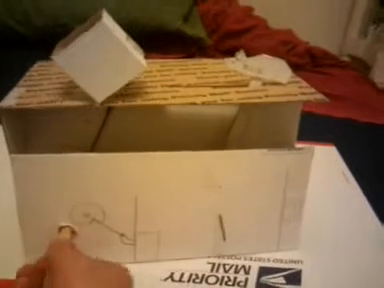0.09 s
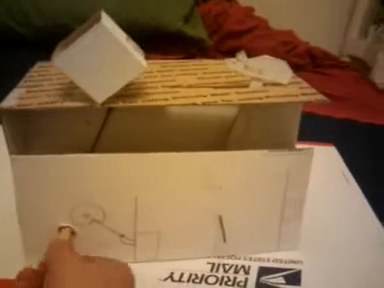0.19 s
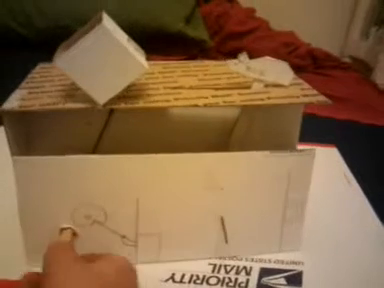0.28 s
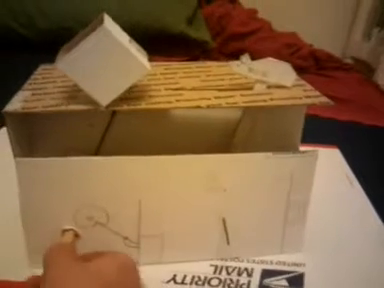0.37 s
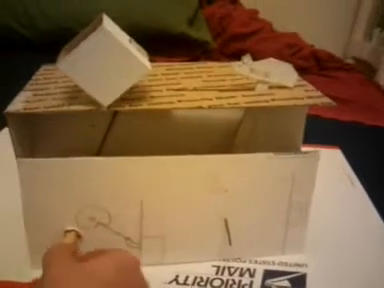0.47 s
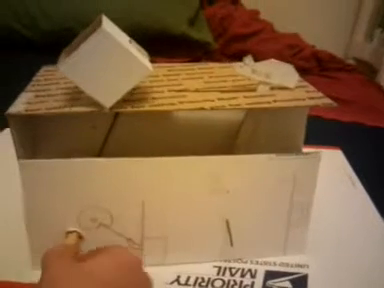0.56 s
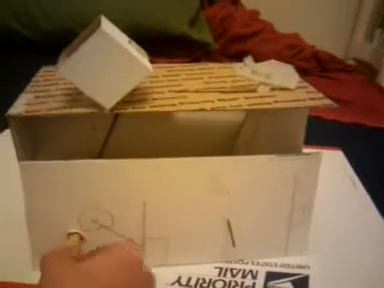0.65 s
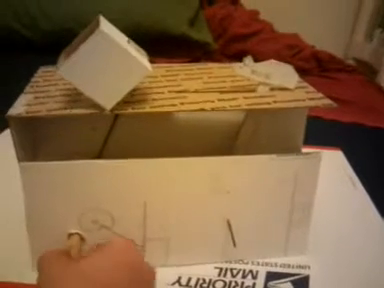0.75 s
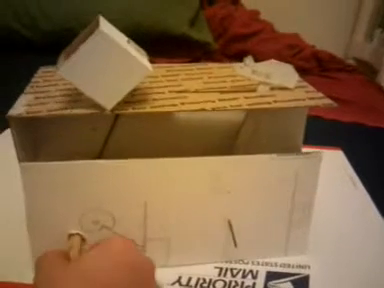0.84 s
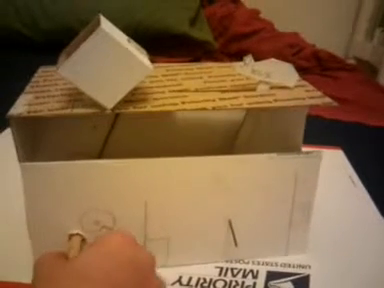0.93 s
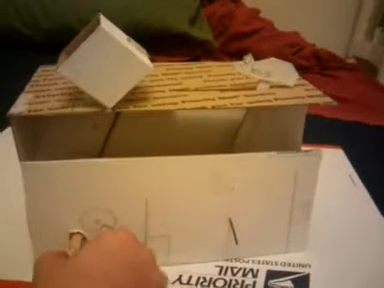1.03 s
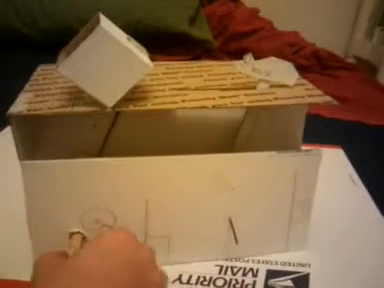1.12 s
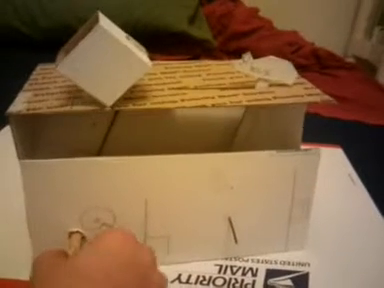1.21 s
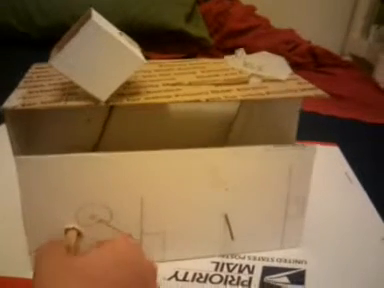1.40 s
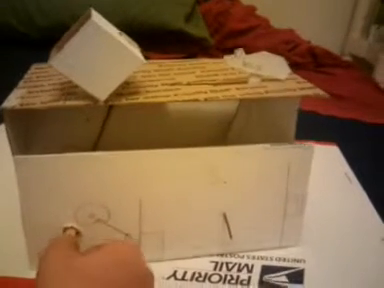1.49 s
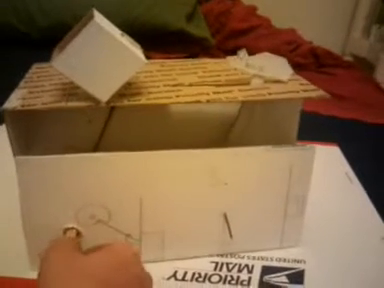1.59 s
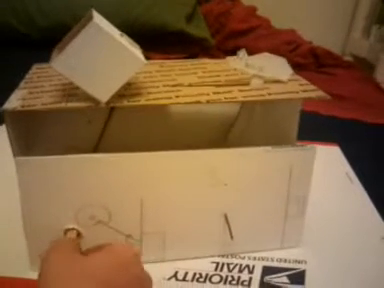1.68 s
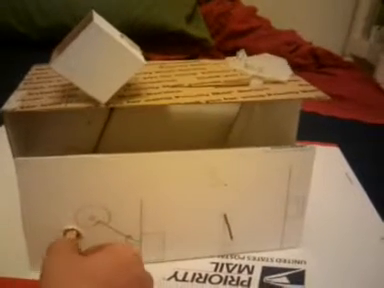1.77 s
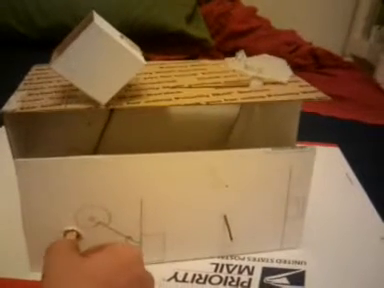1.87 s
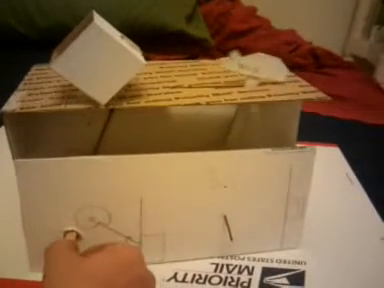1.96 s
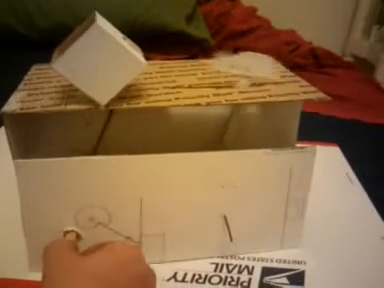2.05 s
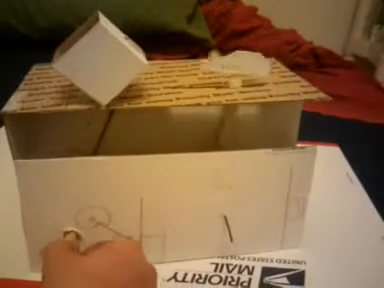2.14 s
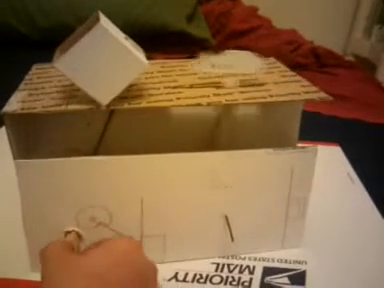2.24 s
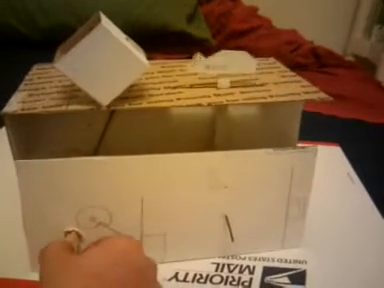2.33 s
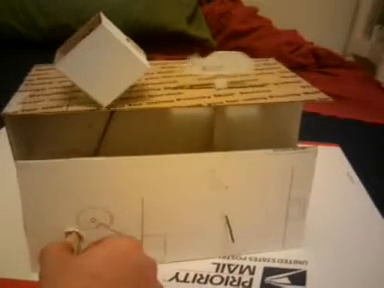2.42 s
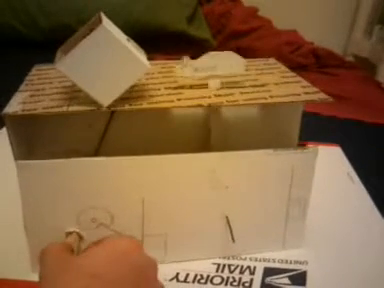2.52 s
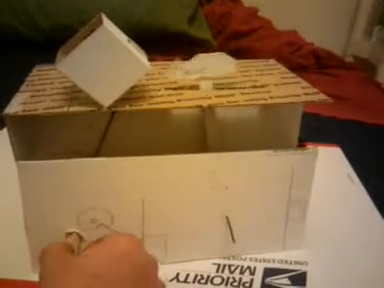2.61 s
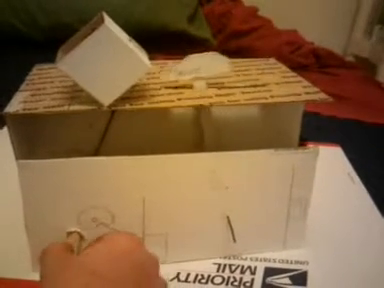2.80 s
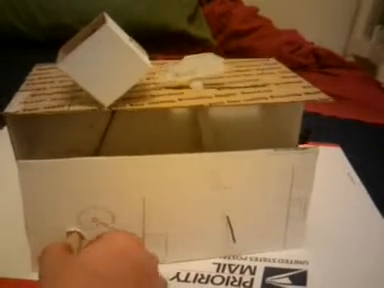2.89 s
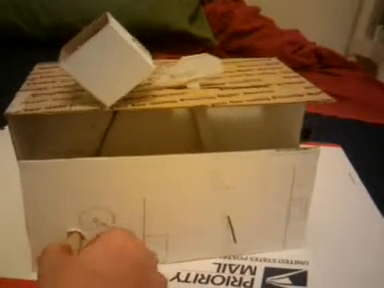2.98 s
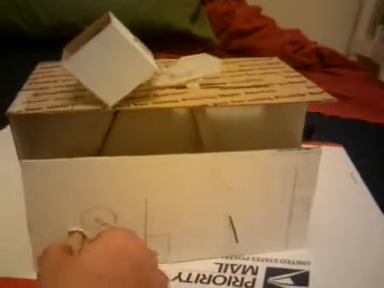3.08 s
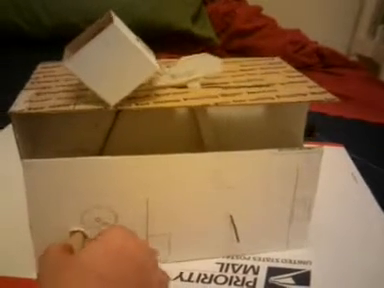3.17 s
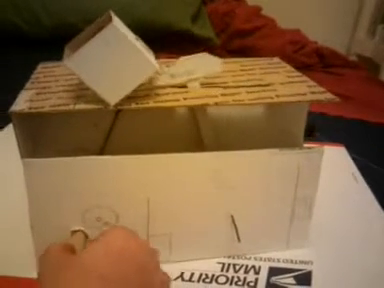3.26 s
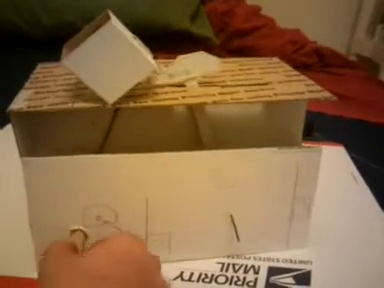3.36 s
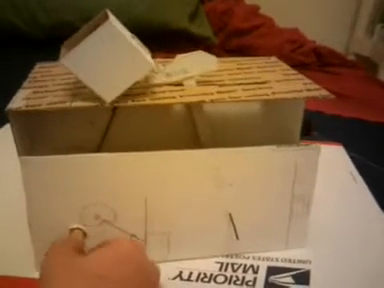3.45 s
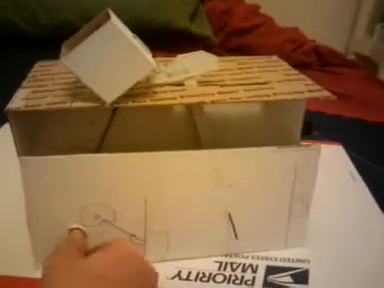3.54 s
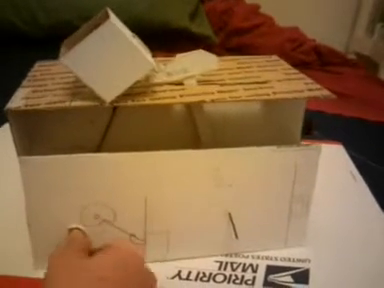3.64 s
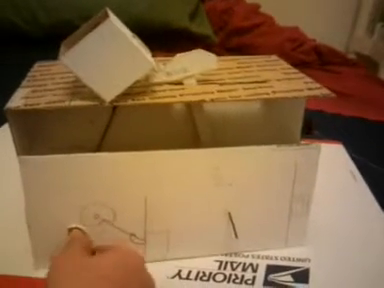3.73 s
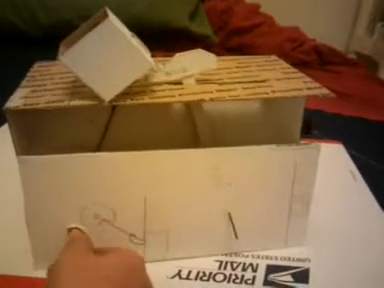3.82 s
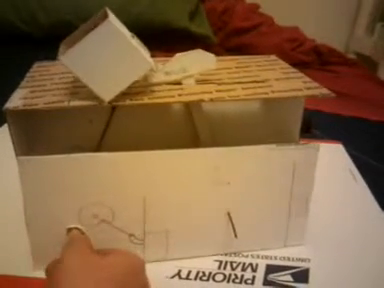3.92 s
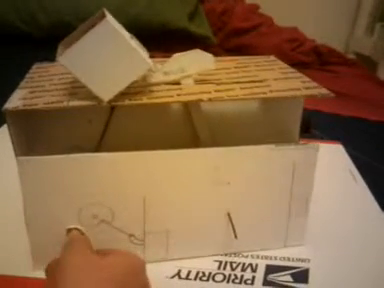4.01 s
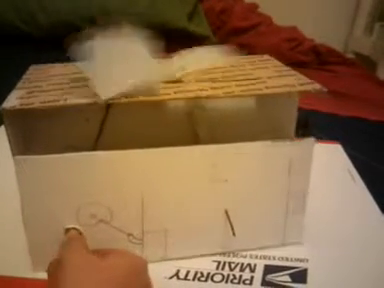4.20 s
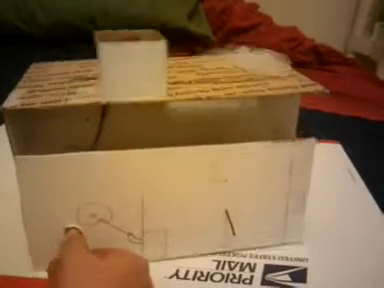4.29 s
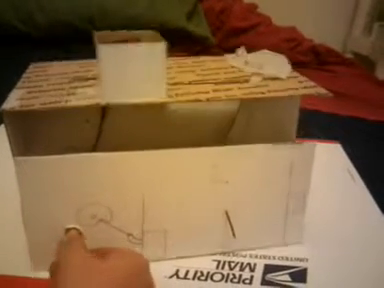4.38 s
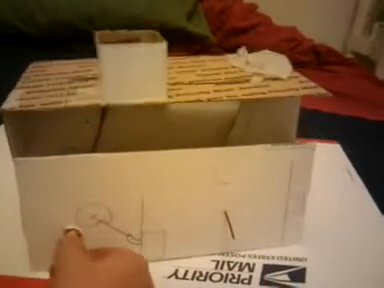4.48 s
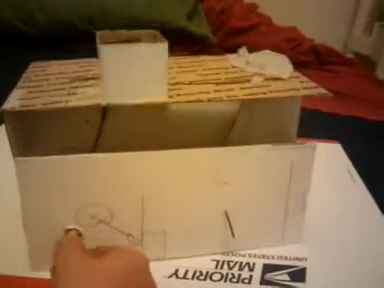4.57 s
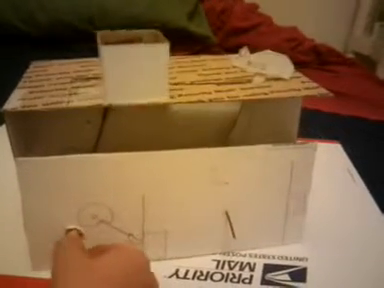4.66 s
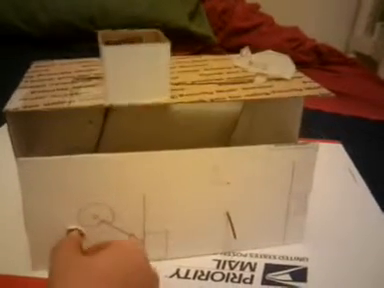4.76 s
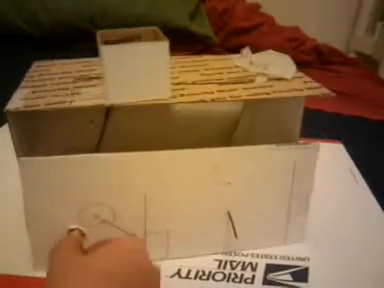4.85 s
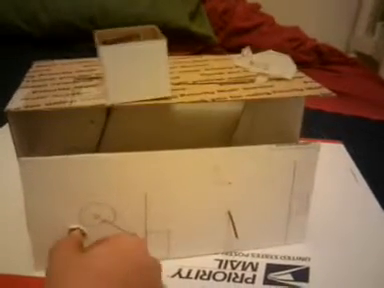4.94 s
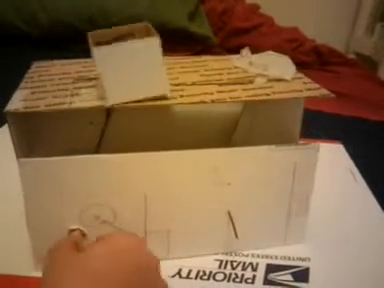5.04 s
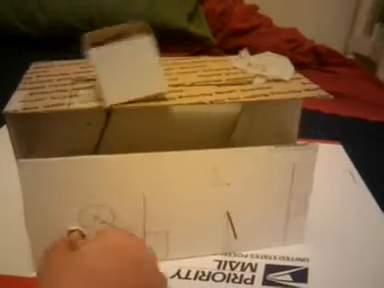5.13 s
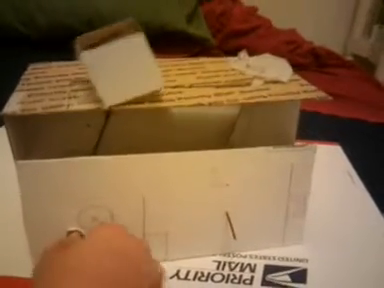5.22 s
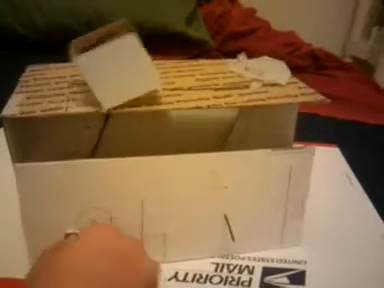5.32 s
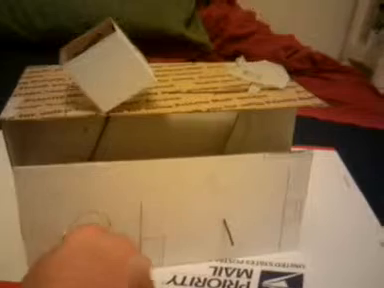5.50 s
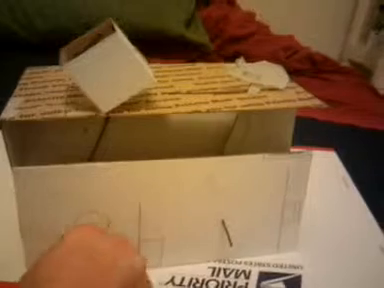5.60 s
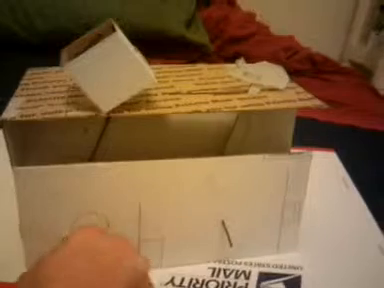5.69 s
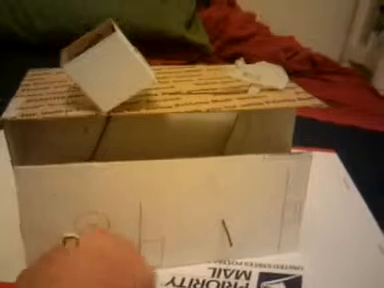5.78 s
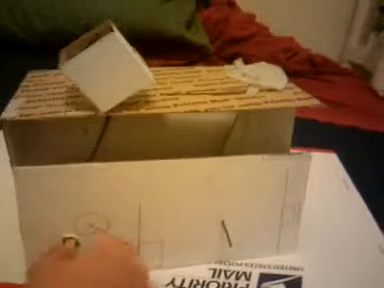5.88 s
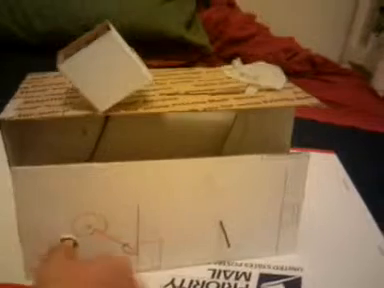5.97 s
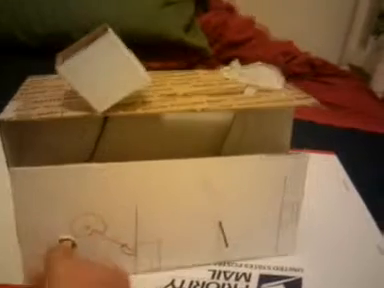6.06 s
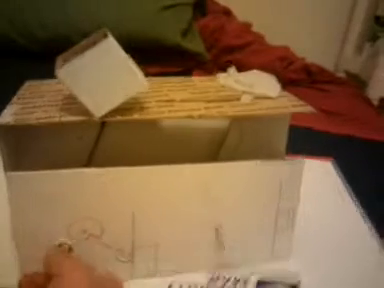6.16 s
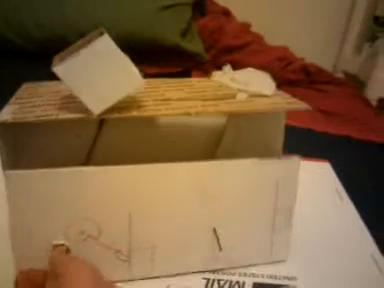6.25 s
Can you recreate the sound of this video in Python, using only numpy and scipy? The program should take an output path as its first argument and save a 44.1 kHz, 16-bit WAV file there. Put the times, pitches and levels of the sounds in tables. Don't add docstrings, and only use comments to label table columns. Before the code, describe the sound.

A small camera microphone sits close to a cardboard box in a quiet bedroom; steady dull hiss and barely audible mains hum run throughout. It opens with a dull jolt and dry wood-on-card rub, then irregular tiny ticks and scrapes until about 1.05 s, densest from 0.6 to 1.0. Mostly hiss follows, with faint catches and rubs at 1.7-2.4. Light cam taps click around 2.7-2.8, then near quiet until a firmer knock at 3.7 and small taps from 3.8 to 4.25. At 4.37 a paper figure snaps back: the loudest, sharp, papery crack with rapid bounces to 4.43 and a rub. At 4.55 a small box lands with a hard, hollow double-contact knock, quickly settling. Duller bumps come at 4.83 and 4.91, the latter clearer; soft rubbing and faint jolts around 5.25-5.5, hiss, then a small double bump at 6.25. Reverberation is short and soft.

```python
import sys
import numpy as np
from scipy import signal
from scipy.io import wavfile
from scipy.ndimage import uniform_filter1d

SR = 44100
rng = np.random.default_rng(int(sys.argv[2]) if len(sys.argv) > 2 else 0)


def ratio_of_db(decibels):
    return 10 ** (np.asarray(decibels, float) / 20)


def generate_wav(sig):
    pcm = np.round(np.clip(np.atleast_2d(sig).T, -1, 1) * 32767).astype(np.int16)
    wavfile.write(sys.argv[1], SR, pcm)


N = 278269

# f/Hz, level/dB rms
HUM_LINES = [(30, -76), (120, -76.5), (148, -70.5), (240, -75.5)]
# f/Hz, level/dB per Hz
HISS_SPECTRUM = [(12, -30), (20, 4), (22, -16), (48, -3.5), (59, -14.5), (103, -5.5), (157, -2.5),
                 (221, -7), (256, -3.5), (296, -10.5), (379, -5.5), (618, -13), (682, -6.5), (2210, -7),
                 (7000, -27), (9100, -54.5), (15400, -120)]
# f/Hz, t60/s
ROOM_T60 = [(200, 0.16), (1000, 0.27), (3000, 0.33), (7000, 0.2)]
# f/Hz, step/band rms
CAMERA_STEP = [(100, .15), (1000, .8), (2300, 1.5), (3500, 2.5), (5500, 2.7), (7000, 2.0)]
CAMERA_TOP_HZ = (6600, 7020, 7300, 7460)

# f/Hz, width/Hz, level/dB
RUBBED_PANEL = [(237, 70, -11.5), (325, 120, -3.5), (494, 180, -4), (704, 220, -4), (936, 200, -0.5),
                (1138, 180, -4.5)]
# f/Hz, width/Hz, level/dB
RUBBED_FOLDS = [(1660, 370, -1), (2310, 220, -5), (3100, 170, -18), (4700, 2700, -15.5)]
# firmest t/s, level/dB, rise/s, fall/s, brightness/dB
STROKES = [(0.015, -48, .05, .09, 1.5), (.17, -52, .07, .07, -3), (.335, -48, .07, .08, -2),
           (.72, -48, .07, .06, -2.5), (.8, -47, .05, .045, -6), (.925, -49.5, .06, .08, -3),
           (.99, -44.5, .1, .06, -7), (1.05, -57, .1, .055, 2), (1.79, -47, .04, .02, -10),
           (2.03, -60, .06, .15, 5), (2.15, -54, .13, .07, -1.5), (2.34, -57, .11, .08, -.6),
           (1.69, -52.5, .02, .055, -4.5), (3.93, -49.5, .04, .08, -3), (4.25, -45, .03, .06, .6),
           (4.345, -50, .09, .2, -5), (4.39, -45, .04, .09, 4), (4.445, -40.5, .1, .075, -8),
           (4.59, -54, .05, .08, 5), (5.255, -53, .035, .06, -2), (5.345, -51, .06, .05, -4),
           (5.44, -49.5, .03, .1, -2), (5.475, -49.5, .2, .07, -3)]

# f/Hz, level/dB, t60/s
HOLLOW_BODY = [(247, 0.5, 0.054), (350, 3.5, 0.035), (442.5, 3, 0.049), (528, -5, 0.078), (743, 0, 0.013)]
# f/Hz, level/dB, t60/s
STIFF_FOLDS = [(1480, -5.5, 0.043), (1798, 4.5, 0.0085), (1910, 0, .015), (2137, 5, 0.012),
               (2677, -15.5, 0.0033), (3456, -14, 0.0095), (4170, -5, 0.018), (5370, -4, 0.014),
               (6600, -21.5, 0.0017)]

# t/s, peak level/dB, panel f/Hz, hardness (folds rel level/dB)
AXLE_SLIPS = [(0.015, -35.5, 964, -7), (0.158, -39.5, 960, -16), (0.179, -39.5, 970, -17),
              (0.306, -37, 906, -13.5), (0.376, -44, 900, -5), (0.625, -33, 953, -12),
              (0.72, -36.5, 983, -21.5), (0.738, -32, 1123, -15.5), (0.767, -38.5, 1055, -12),
              (0.795, -33, 950, -18), (0.81, -36, 910, -12), (0.894, -38, 1104, -18),
              (0.915, -40, 900, -10), (0.973, -29, 1250, -18.5), (1.004, -36, 1193, -16),
              (1.034, -41, 1110, -6), (1.674, -35.5, 906, -22), (1.777, -41.5, 932, -18.5),
              (2.002, -33.5, 966, -16.5), (2.024, -43, 996, -23), (2.137, -40.5, 950, -14),
              (2.154, -43, 824, -10), (2.369, -39.5, 493, -16)]
# t/s, peak level/dB, panel f/Hz, hardness (folds rel level/dB), t60/s
CAM_TAPS = [(0.578, -35.5, 1170, -15, .02), (2.707, -29, 1217, -14, .027), (2.721, -44, 1270, -6, .014),
            (2.79, -33.5, 600, -13, .008), (2.796, -35, 1100, -19, .012), (2.959, -47.5, 920, -4.5, .021),
            (3.812, -38.5, 1170, -22, .05), (3.906, -39, 1375, -10.5, .033),
            (3.977, -36, 1080, -13.5, .025), (4.004, -39, 1084, -15, .015), (4.12, -29, 1100, -6.5, .028),
            (4.234, -35, 1140, -15, .018), (4.91, -22.5, 936, -19, .015), (4.921, -44, 900, -12, .022)]
# t/s, peak level/dB, panel f/Hz, hardness (folds rel level/dB), t60/s
BOX_JOLTS = [(0.002, -30.5, 974, -9, .025), (0.327, -35.5, 878, -5, .022), (0.707, -37, 1200, -9, .03),
             (3.657, -41, 300, -30, .04), (3.71, -25.5, 1043, -11, .02), (3.953, -31.5, 1063, -9, .044),
             (4.259, -40, 430, -20, .025), (4.829, -30.5, 916, -19.5, .022), (4.844, -34, 1000, -14, .018),
             (5.245, -45, 554, -8, .03), (5.349, -40, 734, -16, .022), (6.252, -30, 820, -7, .016),
             (6.269, -35.5, 700, -8, .025)]
# t/s, peak level/dB, panel f/Hz, hardness (folds rel level/dB), t60/s
FIGURE_SNAP = [
    (4.3672, -18.5, 1140, -3.5, .033),
    (4.3700, -15, 860, -4.5, .032),
    (4.3727, -10, 1136, -3, .014),
    (4.3810, -20, 1610, -8, .047),
    (4.394, -22, 1453, -8, .016),
    (4.41, -32.5, 1180, -25, .026),
    (4.434, -24, 1235, -7.5, .05),
]
# t/s, peak level/dB, panel f/Hz, hardness (folds rel level/dB), t60/s
LID_LANDING = [
    (4.5470, -19, 1750, -0.5, .01),
    (4.5503, -16.5, 898, -9, .018),
    (4.562, -31, 1826, -5.5, .03),
    (4.572, -33.5, 974, -2.5, .05),
]

# usual peak level/dB, body rel level/dB there, body loss/dB per dB of peak
SLIP_BODY = (-37, -17, .4)
TAP_BODY = (-33, -18.5, .1)
JOLT_BODY = (-33, -9.5, .3)
SNAP_BODY = (-16, -13, -.1)
LANDING_BODY = (-19, -11, -.6)


def rms_one(x):
    return x / np.sqrt(np.mean(x ** 2) + 1e-20)


def at_hz(points, hz):
    table_hz, values = np.transpose(points)
    return np.interp(np.log(hz), np.log(table_hz), values)


def band(x, low_hz, high_hz):
    return signal.sosfilt(signal.butter(2, [low_hz, high_hz], "band", fs=SR, output="sos"), x)


def resonances(x, peaks):
    out = 0
    for k, (hz, width_hz, level_db) in enumerate(peaks):
        r = np.exp(-np.pi * width_hz / SR)
        b = np.array([1, 0, -1]) * (1 - r * r) / 2
        a = [1, -2 * r * np.cos(2 * np.pi * hz / SR), r * r]
        out = out + (-1) ** k * ratio_of_db(level_db) * signal.lfilter(b, a, x)
    return out


def hum():
    t = np.arange(N) / SR
    wander_rad = np.cumsum(rng.standard_normal((len(HUM_LINES), N)), axis=1) * .012
    out = 0
    for (hz, rms_db), phase in zip(HUM_LINES, wander_rad):
        out = out + np.sqrt(2) * ratio_of_db(rms_db) * np.sin(2 * np.pi * hz * t + phase)
    return out


def hiss():
    level_db = -52.5
    white = rng.standard_normal((2, N + SR))
    edges_hz = 18 * 2 ** (np.arange(28) / 3)
    out = 0
    for k, (low, high) in enumerate(zip(edges_hz, edges_hz[1:])):
        gain = ratio_of_db(at_hz(HISS_SPECTRUM, np.sqrt(low * high)))
        out = out + gain * band(white[k % 2], low, high)
    return ratio_of_db(level_db) * rms_one(out[SR:])


def room(x):
    t, tail = np.arange(SR // 2) / SR, 0
    for hz in 177 * 2. ** np.arange(6):
        noise = band(rng.standard_normal(len(t)), hz / np.sqrt(2), hz * np.sqrt(2))
        tail = tail + noise * ratio_of_db(-60 * t / at_hz(ROOM_T60, hz))
    tail = tail * np.clip(t / 0.0031, 0, 1)
    return signal.fftconvolve(x, tail / np.sqrt(np.sum(tail ** 2)))[:N]


def pressure():
    stroke_fade_db = 12
    shudder_db, follows_db_per_db, bright_db = -55, .45, -3
    lag_s, rise_s, fall_s = .016, .02, .05
    shudders = []
    for s, peak_db, *_ in CAM_TAPS + BOX_JOLTS:
        level_db = shudder_db + follows_db_per_db * (peak_db - TAP_BODY[0])
        shudders.append((s + lag_s, level_db, rise_s, fall_s, bright_db))
    s, rub_db, rise, fall, bright = np.transpose(STROKES + shudders)[:, :, None]
    t = np.arange(0, N + 64, 64) / SR
    away = np.maximum((s - t) / np.maximum(rise, .005), (t - s) / np.maximum(fall, .005))
    level_db = rub_db - stroke_fade_db * away
    gains = ratio_of_db(level_db).max(axis=0), ratio_of_db(level_db + bright).max(axis=0)
    return [np.interp(np.arange(N) / SR, t, g) for g in gains]


def rubbing(slips_per_s, spread_db):
    slips = (rng.random((2, N)) < slips_per_s / SR) * rng.choice([-1, 1], (2, N))
    slips = slips * ratio_of_db(spread_db * np.minimum(rng.exponential(1, (2, N)), 4)) + 1e-18
    panel = resonances(slips[0], RUBBED_PANEL)
    folds = resonances(0.43 * slips[0] + 0.7 * slips[1], RUBBED_FOLDS)
    on_panel, on_folds = pressure()
    return (on_panel * panel + on_folds * folds) / np.std(panel)


def blows(table, contact_s, swell_cycles, crack_db, thud_db, partner_db, scatter_db):
    out, t = np.zeros(N + SR), np.arange(SR // 4) / SR
    luck = rng.standard_normal((len(table), 2, len(HOLLOW_BODY) + len(STIFF_FOLDS) + 1))
    for (s, peak_db, hz, body_db, edge_db, t60), (z, detune) in zip(table, luck):
        crack = rms_one(band(rng.standard_normal(len(t)), 350, 0.42 / contact_s))
        modes = [(hz, 0, t60), (hz * 1.1, partner_db, 0.41 * t60)]
        modes += [(f, g + body_db + 1, d) for f, g, d in HOLLOW_BODY]
        modes += [(f, g + edge_db + 1.5, d) for f, g, d in STIFF_FOLDS]
        f, g, d = np.transpose(modes)[:, :, None]
        g[2:, 0] += scatter_db * z[1:]
        f[1:, 0] *= 1 + 0.056 * detune
        soft = 1 / (1 + (f * contact_s * 1.1) ** 4)
        rise = (1 - np.exp(-t / contact_s)) ** 2
        swell = 1 - np.exp(-t * f / swell_cycles)
        decay = ratio_of_db(g - 60 * t / np.clip(d, .003, .5))
        ring = rise * np.sum(soft * swell * decay * np.sin(2 * np.pi * f * t), axis=0)
        ring += ratio_of_db(edge_db + crack_db - 60 * t / 0.013) * rise * crack
        ring += ratio_of_db(thud_db + body_db / 2 - 60 * t / .09) * np.sin(2 * np.pi * 125 * t)
        at = round((s + 3 * contact_s) * SR)
        out[at:at + len(t)] += ratio_of_db(peak_db) * ring
    return band(out[:N], 105, 9000)


def voiced(table, kind):
    usual_db, body_db, body_loss = kind
    out = []
    for s, peak_db, hz, edge_db, t60 in table:
        out.append((s, peak_db, hz, body_db - body_loss * (peak_db - usual_db), edge_db, t60))
    return out


def light_contacts():
    slips = [(*row, .017 - .0008 * row[3]) for row in AXLE_SLIPS]
    table = voiced(slips, SLIP_BODY) + voiced(CAM_TAPS, TAP_BODY) + voiced(BOX_JOLTS, JOLT_BODY)
    return blows(sorted(table), contact_s=.0003, swell_cycles=1.3, crack_db=-5, thud_db=-18.5,
                 partner_db=-1.5, scatter_db=3.5)


def snap_and_landing():
    table = voiced(FIGURE_SNAP, SNAP_BODY) + voiced(LID_LANDING, LANDING_BODY)
    return blows(table, contact_s=.0001, swell_cycles=0.26, crack_db=-3.5, thud_db=-15,
                 partner_db=-5.5, scatter_db=1.0)


def scene():
    floor = hum() + hiss()
    rub = ratio_of_db(-2.0) * rubbing(slips_per_s=600.0, spread_db=4.0)
    taps = ratio_of_db(2.5) * light_contacts()
    knocks = ratio_of_db(-7.5) * snap_and_landing()
    wet = room(ratio_of_db(-11.5) * taps + ratio_of_db(-7.5) * knocks + ratio_of_db(-9) * rub)
    return (taps + knocks + rub + wet + floor)[None]


def lapped_rounding(x, size, camera_sr, step_db, thrift):
    n, k = np.arange(2 * size), np.arange(size * camera_sr // SR)
    window = np.sin(np.pi * (n + .5) / (2 * size))
    basis = np.cos(np.pi / size * np.outer(k + .5, n + .5 + size / 2)) * window
    starts, lead = np.arange(0, N + size, size), size - 460 % size
    padded = np.pad(x, (lead, 3 * size))
    lines = basis @ padded[starts + n[:, None]]
    hz = (k[:, None] + .5) * SR / (2 * size)
    level = np.sqrt(uniform_filter1d(lines ** 2, size=size // 80 + 1, axis=0) + 1e-20)
    spare = rng.standard_normal(len(starts))
    uneven = uniform_filter1d(rng.standard_normal((64, len(starts))), size=2)
    uneven = rms_one(uneven)[k * 64 // len(k)]
    step = level * at_hz(CAMERA_STEP, hz) * ratio_of_db(step_db - 1.2 * spare + 1.8 * uneven)
    energy = np.sum(lines ** 2, axis=0)
    loud = np.log10(energy / np.median(energy))
    richness = np.digitize(spare - thrift * np.clip(loud, 0, 1), [-1.8, -.3, .4])
    top_hz = np.take(CAMERA_TOP_HZ, richness)
    rounded = np.sign(lines) * np.floor(abs(lines) / step + .4) * step * (hz < top_hz)
    out = np.zeros(len(padded))
    np.add.at(out, starts + n[:, None], basis.T @ rounded * 2 / size)
    return out[lead:lead + N]


def camera(x):
    camera_sr = 16000
    power = uniform_filter1d(x ** 2, size=220)
    attack = power[440:] > ratio_of_db(2 * 12) * uniform_filter1d(power, size=880)[:-440]
    near = uniform_filter1d(np.pad(attack, (1000, 0))[:N] * 1., size=3000) > 1e-6
    short = uniform_filter1d(near * 1., size=600)
    steady = np.sqrt(np.clip(1 - short, 0, 1))
    out = steady * lapped_rounding(steady * x, 2822, camera_sr, step_db=-.5, thrift=2)
    out += short * lapped_rounding(x, 353, camera_sr, step_db=-.7, thrift=-2)
    carrier = np.cos(2 * np.pi * camera_sr * np.arange(N) / SR)
    mirror = band(band(out, 7100, 7600) * carrier, 8500, 8850)
    return out + ratio_of_db(-16) * mirror


def top_cut(x):
    return signal.sosfilt(signal.butter(12, 8800, fs=SR, output="sos"), x)


def record(dry):
    mix = camera(dry[0])[None] - .0008
    return top_cut(mix)


dry = scene()
out = record(dry)
generate_wav(out)
```